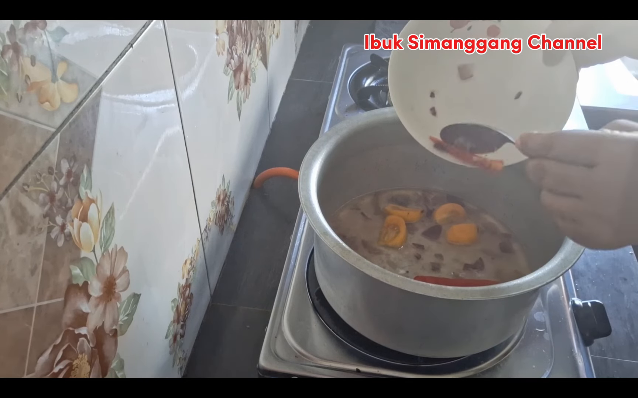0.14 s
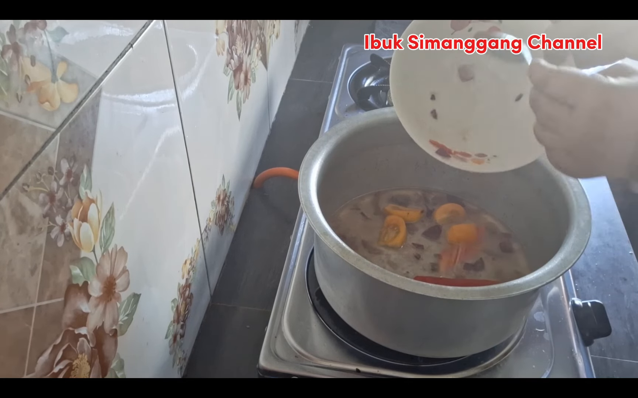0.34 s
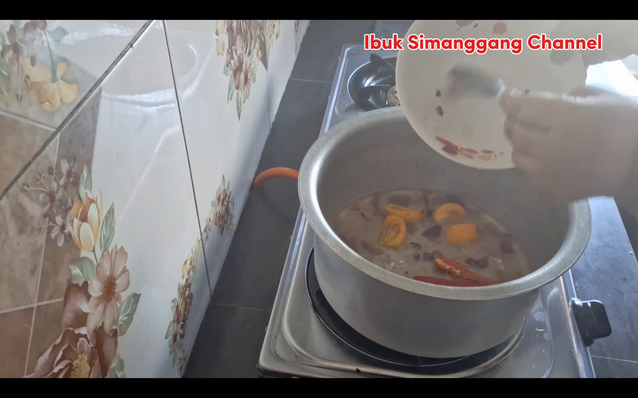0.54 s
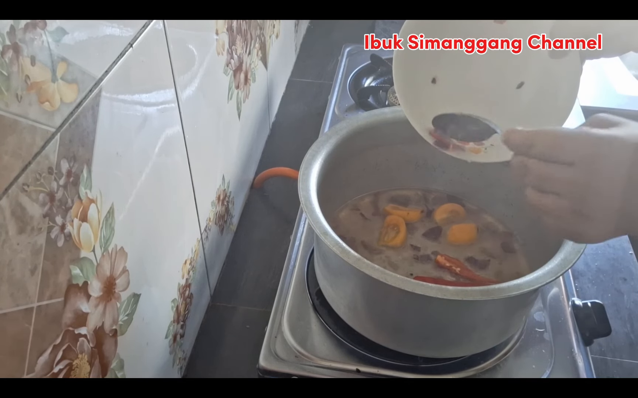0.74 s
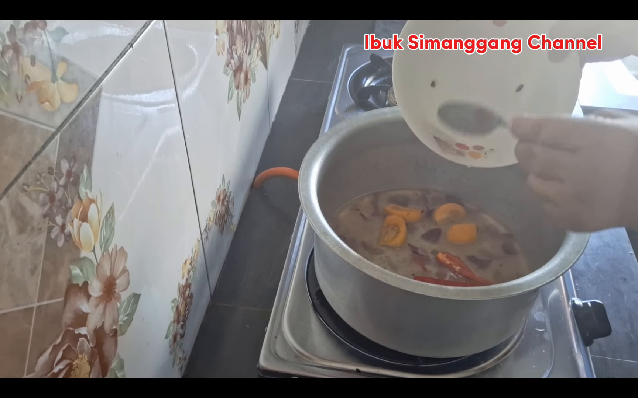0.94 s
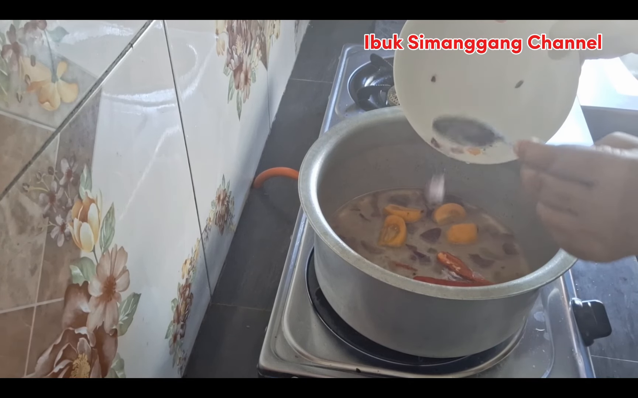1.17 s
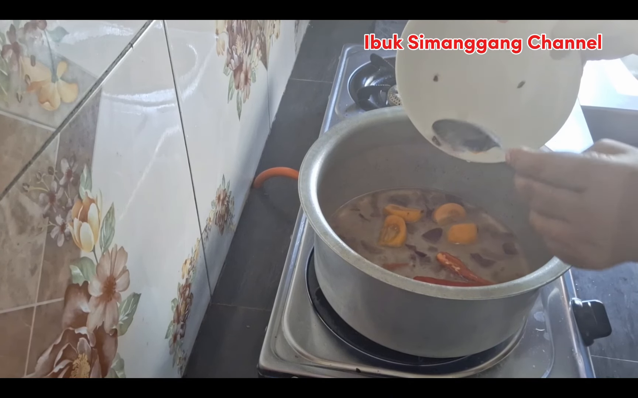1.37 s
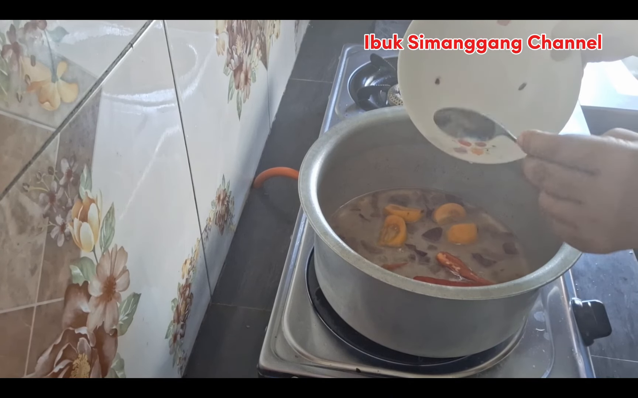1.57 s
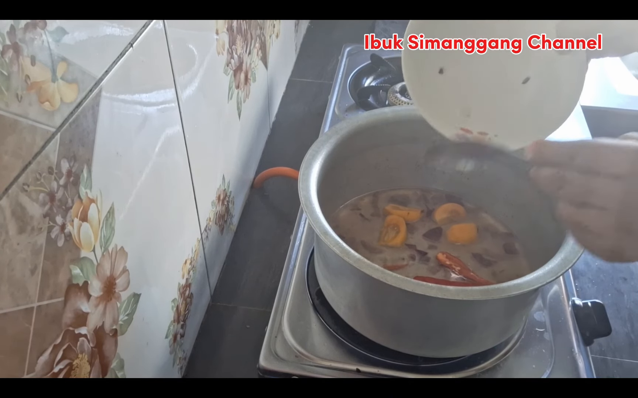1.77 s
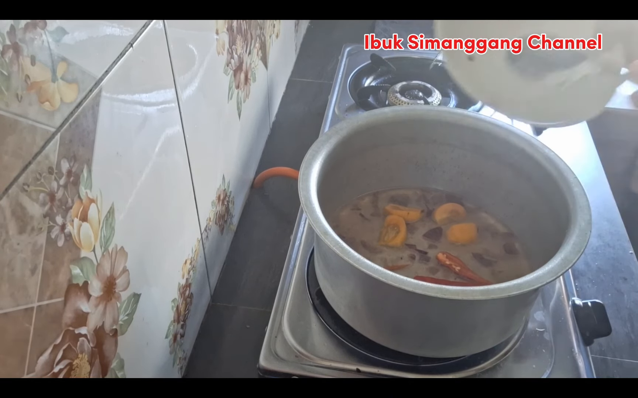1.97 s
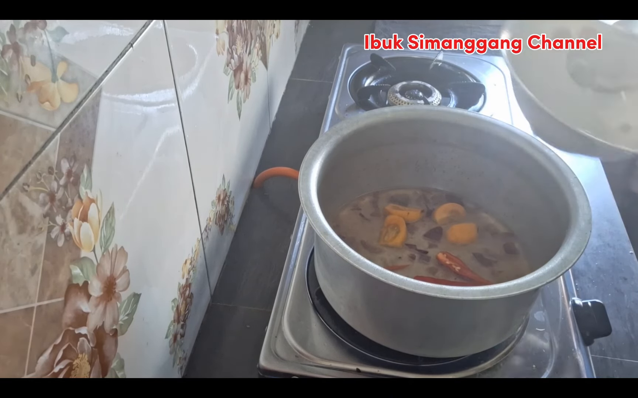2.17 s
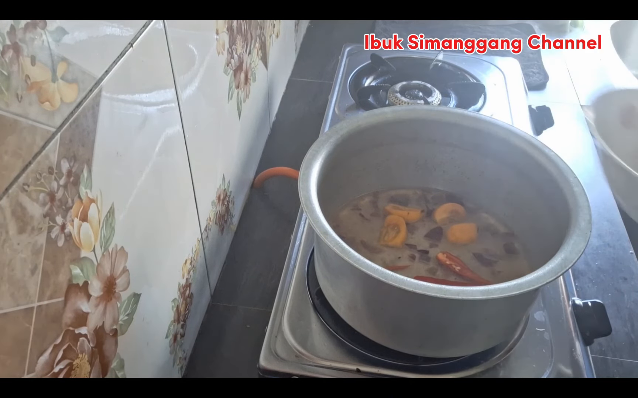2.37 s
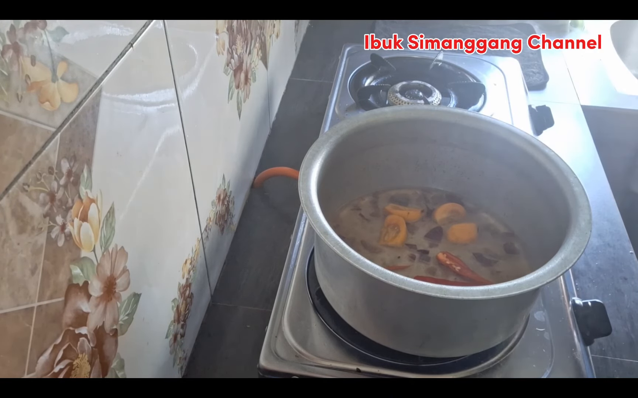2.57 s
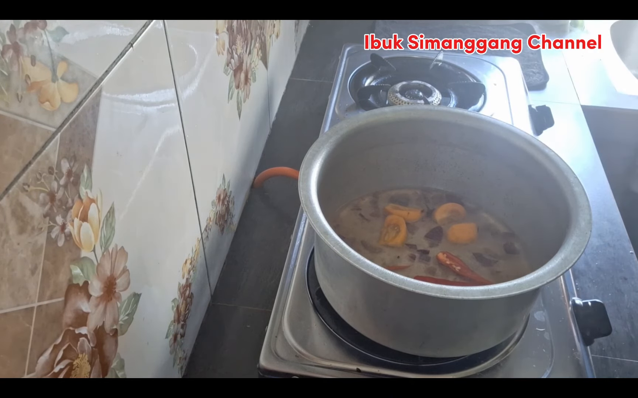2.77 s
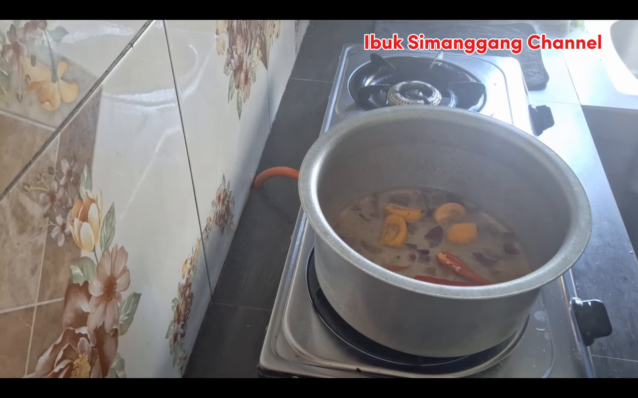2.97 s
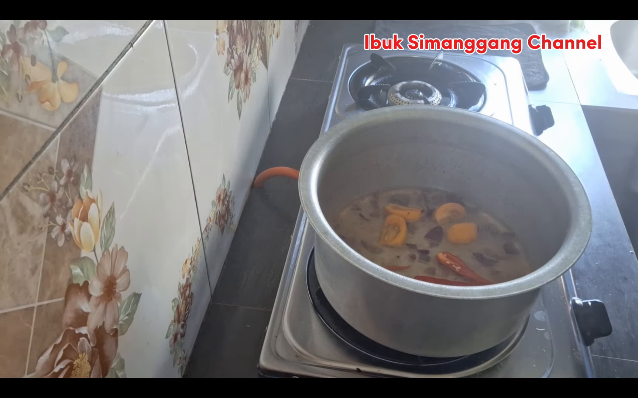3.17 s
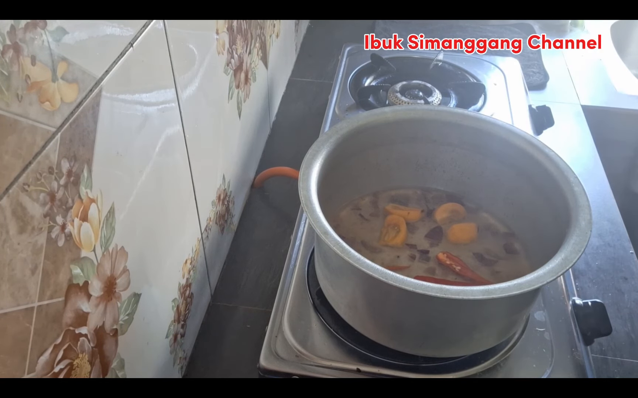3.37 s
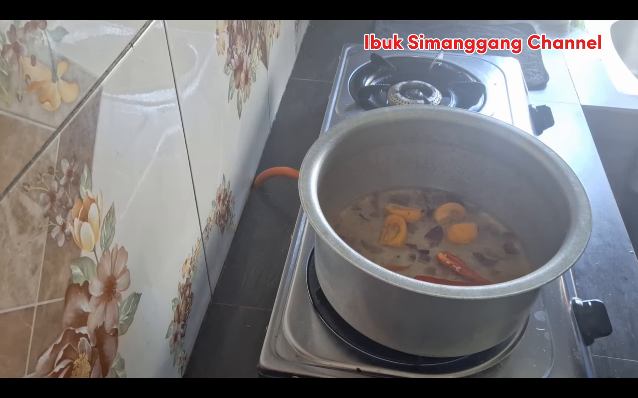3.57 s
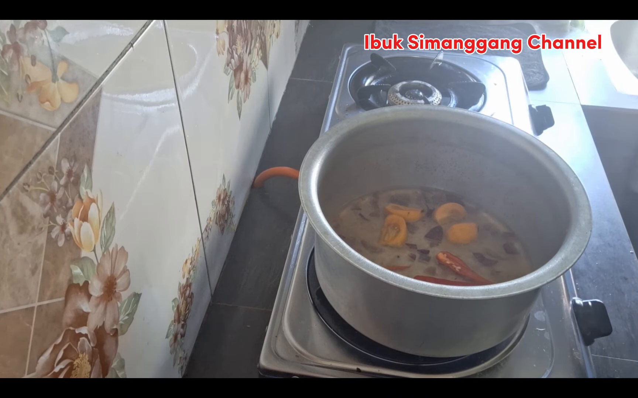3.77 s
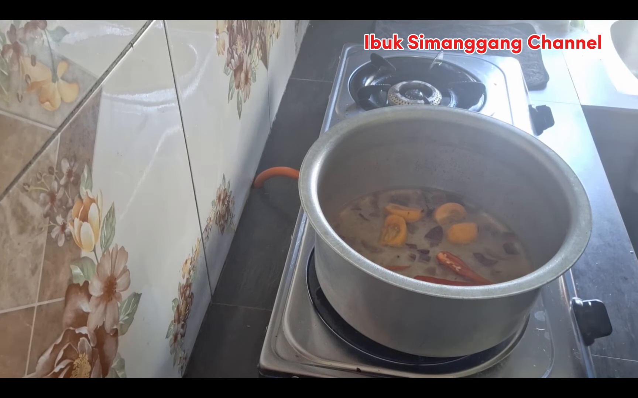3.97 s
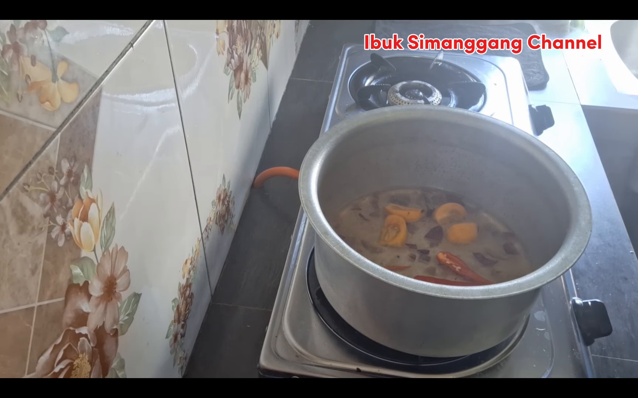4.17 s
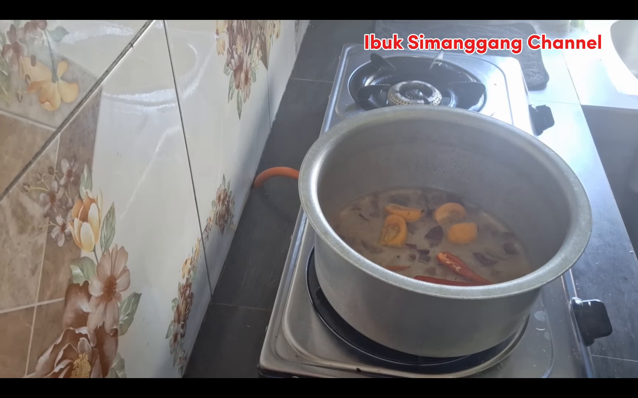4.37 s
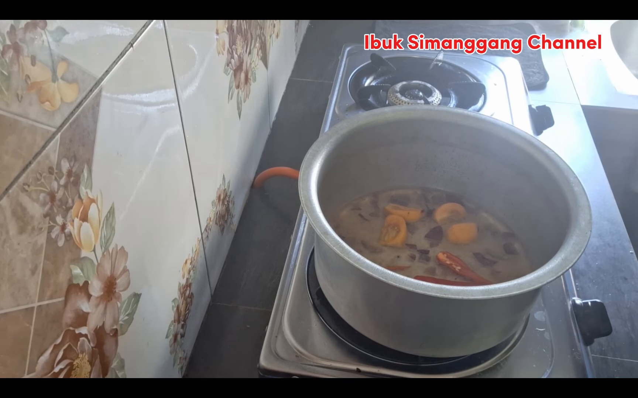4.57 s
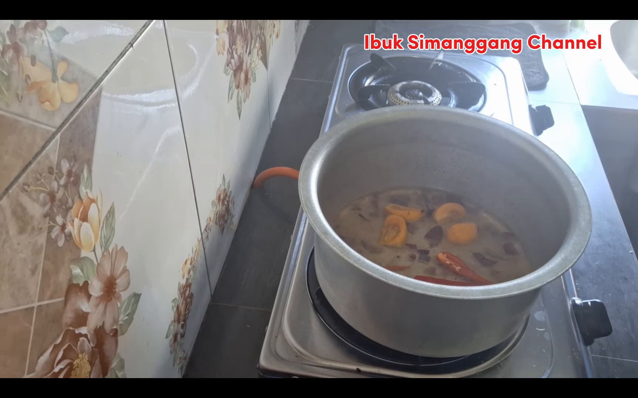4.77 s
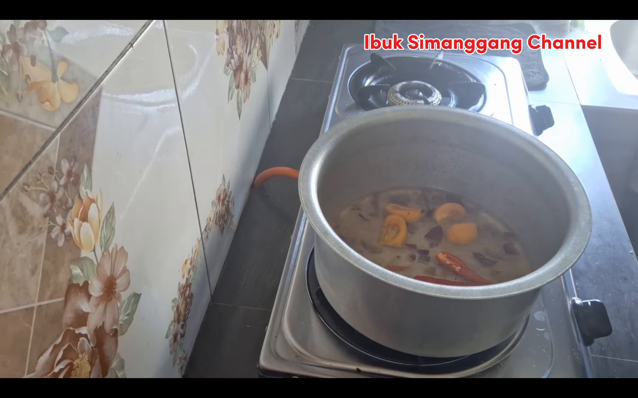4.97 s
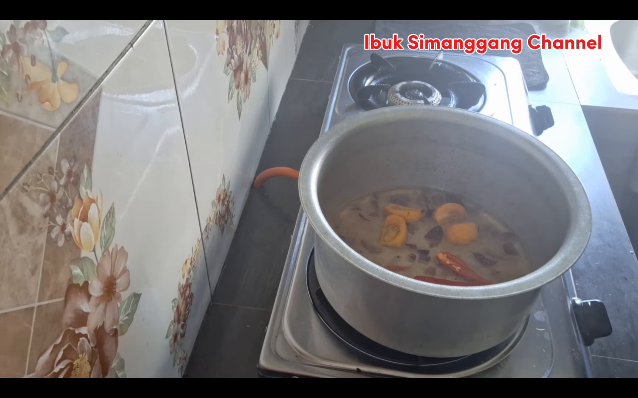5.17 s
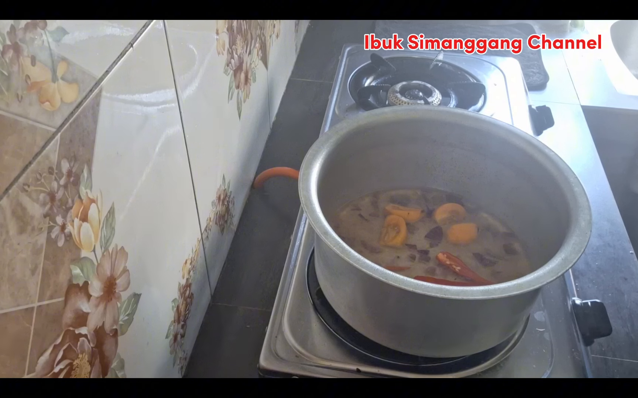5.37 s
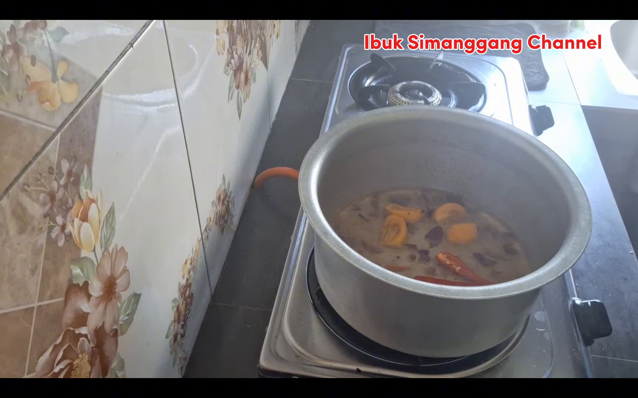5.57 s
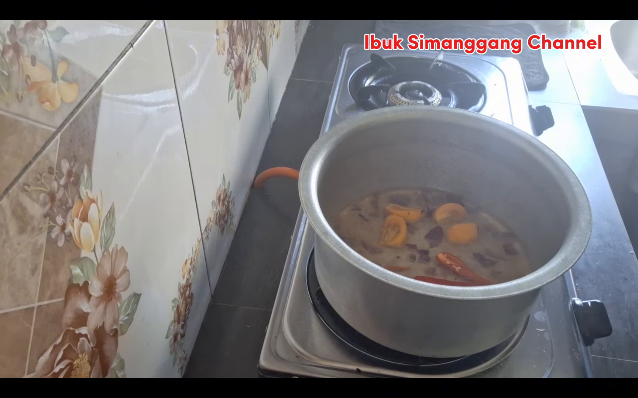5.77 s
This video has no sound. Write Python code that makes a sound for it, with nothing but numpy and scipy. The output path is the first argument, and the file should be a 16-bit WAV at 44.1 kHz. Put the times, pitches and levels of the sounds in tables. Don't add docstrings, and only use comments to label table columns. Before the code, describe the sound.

In a small tiled kitchen, a wavering low motor hum and gas flame hiss run throughout. Close to a stereo microphone, a spoon ticks and scrapes a ceramic bowl, then taps it three times with bright rings. Bowl and spoon rattle together, go nearly quiet, then land on a counter with a double clack and a little glassy jiggle.

```python
import sys
import numpy as np
from scipy import signal
from scipy.fft import rfft, irfft, next_fast_len
from scipy.io import wavfile
from scipy.ndimage import uniform_filter1d

SR = 44100
rng = np.random.default_rng(int(sys.argv[2]) if len(sys.argv) > 2 else 0)


def inscribe(sig):
    pcm = np.round(np.clip(np.atleast_2d(sig).T, -1, 1) * 32767)
    wavfile.write(sys.argv[1], SR, pcm.astype(np.int16))


def elevation(decibels):
    levels = np.asarray(decibels, float)
    return 10 ** (levels / 20)


N = 256662


def evened(x):
    return x / np.sqrt(np.mean(x ** 2) + 1e-20)


def read(points, hz):
    f, value = np.transpose(points)
    return np.interp(np.log(hz + 1), np.log(f + 1), value)


def along(rows, t):
    s, db = np.transpose(rows)
    return np.interp(t, s, db)


def fuzzy_tone(hz, width):
    r = np.exp(-np.pi * width / SR)
    noise = rng.standard_normal(N) + 1j * rng.standard_normal(N)
    slow = signal.lfilter([1], np.convolve([1, -r], [1, -r]), noise)
    return slow * np.exp(2j * np.pi * hz * np.arange(N) / SR)


def fading_tone(hz, width, fade):
    tone = fuzzy_tone(hz, width)
    return evened((tone * abs(tone) ** (fade - 1)).real)


# t/s, level/dB
BACKGROUND_SWELL = [(0.0, 4), (0.45, 6), (1.0, 5), (1.05, -0.5), (2.3, 0), (4.25, -1), (4.5, 4), (5.1, 3),
                    (5.82, 1)]
# t/s, level/dB
MOTOR_LEVEL = [(0.0, -34), (0.3, -30), (0.39, -37), (0.46, -28), (0.86, -41.5), (0.99, -35), (1.06, -53),
               (1.57, -36), (1.81, -47), (1.92, -37), (2.78, -47.5), (3.28, -36), (3.4, -39), (4.3, -42),
               (4.5, -31.5), (4.68, -38.5), (5.12, -33.5), (5.5, -37)]
# f/Hz, width/Hz, level/dB re the overtone group
MOTOR_OVERTONES = [(113.2, 2.3, -12), (180.7, 14.7, -16.5), (280.3, 11.9, -18), (690, 35, -14)]


def hum():
    t = np.arange(N) / SR
    swell_db = along(BACKGROUND_SWELL, t)
    low = elevation(-44.5 + 1.06 * swell_db) * fading_tone(59, 6.9, fade=0.61)
    main = elevation(along(MOTOR_LEVEL, t)) * fading_tone(92.5, 5, fade=0.44)
    overtones = sum(elevation(db) * evened(fuzzy_tone(hz, width).real) for hz, width, db in MOTOR_OVERTONES)
    tones = low + main + elevation(-40.5 + 0.98 * swell_db) * overtones
    return np.array([elevation(1.5) * tones, elevation(-1.0) * np.roll(tones, 25)])


# f/Hz, level/(dB per Hz)
HISS_COLOUR = [(12, -45), (20, -26), (43, -10), (75, 9), (102, -7.5), (147, -10.5), (224, -21),
               (289, -15.5), (382, -34.5), (452, -24.5), (599, -27), (750, -30), (5360, -36.5),
               (15200, -48), (16500, -78.5)]
# f/Hz, correlation
PORT_LIKENESS = [(60, 0.77), (130, 1), (290, 0.66), (640, 0.66), (1410, -0.1), (3100, -0.036),
                 (6820, -0.12), (15000, 0.061)]
# f/Hz, left minus right level/dB
PORT_LEAN = [(60, 3.5), (180, 3.0), (550, 1.0), (1650, 1.0), (4970, -0.5), (15000, -2.0)]


def hiss():
    frames, hz = N // 512 + 5, np.fft.rfftfreq(2048, 1 / SR)
    a, b, c, d, patches = rng.standard_normal((frames, 1025, 5)).T
    patches = evened(uniform_filter1d(uniform_filter1d(patches, 16, 0), 6, 1))
    same = np.clip(read(PORT_LIKENESS, hz), -1, 1)[:, None]
    left = a + 1j * b
    right = same * left + np.sqrt(1 - same ** 2) * (c + 1j * d)
    z = np.array([left, right])
    z *= elevation(np.array([[.5], [-.5]]) * read(PORT_LEAN, hz))[:, :, None]
    swell = along(BACKGROUND_SWELL, (np.arange(frames) - 2) * 512 / SR)
    bass = (1 / (1 + (hz / 330) ** 4))[:, None]
    reach = read([(1500, 0.98), (8000, 0.26)], hz)[:, None]
    rumble_db, flame_db = -5 + 0.9 * swell, 13 + 0.66 * swell
    swell_db = bass * rumble_db + (1 - bass) * reach * flame_db
    colour_db = read(HISS_COLOUR, np.minimum(hz, 15000)) - 30 * (hz > 15900)
    z *= elevation(colour_db[:, None] + 0.97 * patches + swell_db)
    return elevation(21.5) * signal.istft(z, nperseg=2048, noverlap=1536)[1][:, :N] / 2048


# f/Hz, t60/s
ROOM_DECAY = [(500, 0.49), (2500, 0.47), (8000, 0.44), (14000, 0.27)]


def kitchen(x):
    taps = np.zeros((2, SR))
    at = np.arange(300, SR - 20, 20) + rng.integers(0, 20, (2, (SR - 301) // 20))
    np.put_along_axis(taps, at, rng.choice([-1., 1.], at.shape), 1)
    hz, t, z = signal.stft(taps, SR, nperseg=256)
    fall = elevation(-60 * t / read(ROOM_DECAY, hz)[:, None])
    spectrum = rfft(signal.istft(z * fall, SR, nperseg=256)[1])
    power = abs(spectrum) ** 2
    level_out = np.sqrt(uniform_filter1d(power, size=800) / uniform_filter1d(power, size=25))
    tail = irfft(spectrum * level_out)[:, :SR * 3 // 4]
    tail[:, :300] = 0
    return signal.fftconvolve(x, tail / np.linalg.norm(tail[0]), axes=1)[:, :N]


def chatter(seconds, db, size):
    t = np.arange(size) / SR
    contact = rng.standard_normal(size) * (rng.random(size) < 1500 / SR) * np.exp(-(t / seconds) ** 2)
    contact = elevation(db) * contact / np.linalg.norm(contact)
    contact[0] = 1
    return contact


def blows(rows, body, reach, chatter_s, chatter_db, crack_db, grip_s, grip_db, free, size=7200):
    out, t = np.zeros((2, N + size)), np.arange(size) / SR
    hz = np.fft.rfftfreq(size, 1 / SR)
    centres = np.array([np.mean([mode[0] for mode in family]) for family in body])
    lowest_hz = 0.42 * min(mode[0] for family in body for mode in family)
    grip = elevation(grip_db / (1 + np.exp(-(t - grip_s) / .002)))
    rise = 1 - np.exp(-t / 0.000097)
    crack_edges_db = 45 * np.log10(np.minimum(hz / (1.08 * centres.min()), 1) + 1e-3)
    crack_edges_db += -8 * np.log2(np.maximum(hz / centres.max(), 1))
    base_db, shift_db = np.transpose(reach)
    for s, strength_db, hardness, spot in rows:
        tilt_db = hardness * np.log2(centres / 4000)
        levels = strength_db + base_db + tilt_db + spot * shift_db
        contact = chatter(chatter_s, chatter_db, size)
        drive = np.sqrt(uniform_filter1d(abs(rfft(contact)) ** 2, size=25) + 0.033)
        crack_colour_db = read(sorted(zip(centres, levels)), hz) + crack_edges_db
        crack = irfft(rfft(rng.standard_normal((2, size))) * elevation(crack_colour_db), size)
        ring = rise * elevation(crack_db - 60 * t / 0.11) * crack / np.linalg.norm(contact)
        for family, level_db in zip(body, levels):
            for mode_hz, db, t60 in family:
                start = rng.uniform(0, 2 * np.pi)
                apart = rng.choice([-1, 1]) * rng.uniform(0.38, 1.0) * min(mode_hz / 900, 1)
                turn = start + apart * np.array([[-1], [1]])
                height = elevation(level_db + db - 60 * t / (free * t60)) / np.interp(mode_hz, hz, drive)
                ring += rise * height * np.sin(2 * np.pi * mode_hz * t + turn)
        at = round(s * SR)
        out[:, at:at + size] += grip * signal.fftconvolve(ring, contact[None], axes=1)[:, :size]
    bass_cut = signal.butter(4, lowest_hz, "high", fs=SR, output="sos")
    return signal.sosfilt(bass_cut, out[:, :N])


# f/Hz, level/dB, t60/s
GLASS_MODES = [
    [(4330, 0, 0.081), (4340, 1, 0.066)],
    [(2890, 0, 0.12)],
    [(2840, 0, 0.06)],
    [(7300, 0, .04)],
    [(10500, 0, 0.0099), (12800, 0, 0.0098), (14600, 0, .008)],
]
# level/dB struck mid-side, gain/dB as the spot moves to +1
GLASS_SHARE = [(5, 6), (-5, 11), (0, -4), (-6.6, 0.3), (-6, 2)]
# t/s, level/dB, hardness/(dB per octave), spot -1 to 1
GLASS_TOUCHES = [(4.955, -49, 4.4, 0.11), (4.9755, -51.6, -1.2, 0.96), (4.9942, -57, 8, 0.14),
                 (5.0152, -48.5, -1.9, 0.3), (5.0294, -61, -2.0, -0.91), (5.046, -44, 0, -1.0),
                 (5.0624, -55.6, -4.3, -0.01), (5.1544, -50, 0.9, -0.14), (5.1744, -56, -2.6, 0.12)]


def glass_jiggle():
    return blows(GLASS_TOUCHES, GLASS_MODES, GLASS_SHARE, chatter_s=0.01, chatter_db=4, crack_db=4,
                 grip_s=0.037, grip_db=3.0, free=1.33)


# f/Hz, level/dB, t60/s
COUNTER_MODES = [
    [(1077, -5.5, 0.058), (1184, -2.5, 0.029)],
    [(709, -0.5, 0.092), (505, -4, 0.068), (384, -25, 0.034), (813, 1, 0.074), (960, 4.5, 0.048)],
    [(1560, -4.5, 0.032), (1730, -7, 0.049), (1910, -3, 0.016), (2160, -7.5, 0.038), (2550, -6.5, 0.024),
     (2720, -11.5, 0.027)],
    [(3876, -4, 0.075), (4010, -6, 0.068)],
    [(7480, -4, 0.16), (7350, -1, 0.065), (5800, 3, 0.016), (8100, -9, 0.22), (8780, -1.5, 0.038),
     (9500, -16, 0.086), (9670, -5, 0.12), (12900, -14, .03)],
]
# level/dB struck mid-side, gain/dB as the spot moves to +1
COUNTER_SHARE = [(12, -7.5), (-3.5, -6.5), (6, 9), (-1.8, 2), (-11.5, -13.5)]
# t/s, level/dB, hardness/(dB per octave), spot -1 to 1
LANDINGS = [
    (4.7281, -15, -0.5, 0.14),
    (4.7457, -15, 3, -0.063),
    (4.7744, -37.5, -5, 0.59),
    (4.817, -33.5, -3, -0.26),
    (4.8278, -23.5, 3.5, -0.52),
    (4.8556, -33, 1.2, -.23),
    (4.9048, -48, -2, 0.33),
    (4.9844, -53.5, -8.5, 0.97),
]


def set_down():
    return blows(LANDINGS, COUNTER_MODES, COUNTER_SHARE, chatter_s=0.01, chatter_db=-2.5, crack_db=-1.5,
                 grip_s=0.013, grip_db=3.5, free=0.89)


# f/Hz, level/dB, t60/s
STACK_MODES = [
    [(3775, 0, .08), (3960, -7, .04), (3535, -12, .03)],
    [(3828, 0, .08), (2660, -9, .14), (6126, -5, .07), (8689, -9, .07), (10438, -12, .05)],
    [(4140, 0, .09), (5780, -1, .08), (6240, -6, .04), (7780, -5, .05), (8110, -3, .06)],
    [(7255, 0, .06), (7375, -8, .05), (9800, -10, .04)],
    [(13400, 0, .04), (12800, -2, .05), (12300, -4, .04), (11275, -4, .05), (11520, -6, .04),
     (9375, -6, .04), (8980, -7, .04), (14923, -5, .04)],
]
# level/dB struck mid-side, gain/dB as the spot moves to +1
STACK_SHARE = [(0.86, -12), (-0.55, 13.5), (-2.2, -6.5), (-0.21, 18), (-1.3, -5)]
# t/s, level/dB, hardness/(dB per octave), spot -1 to 1
STACK_KNOCKS = [
    (2.7817, -9.5, -3.5, 0.32),
    (2.9213, -12.8, -10.5, -0.2),
    (2.9359, -26.5, -0.5, 0.52),
    (2.9934, -24, 1.5, -0.75),
    (3.0071, -16.5, 1.5, -0.56),
    (3.1599, -13, -7.6, 0.056),
    (3.2305, -20.5, -3, -0.094),
]
# t/s, level/dB, hardness/(dB per octave), spot -1 to 1
STACK_SLIPS = [(2.7977, -23.5, -0.5, -0.6), (2.908, -36, -2, 0.26), (2.9149, -32.5, 3, -0.29),
               (3.0234, -44.5, 19, 0.43), (3.0488, -29.5, 4.5, -0.17), (3.0755, -38.5, 8, 0.45),
               (3.0919, -30, 3, 0.12), (3.1098, -35, 1.6, 0.17), (3.243, -47, 0, 0.1)]


def rattle():
    knocks = blows(STACK_KNOCKS, STACK_MODES, STACK_SHARE, chatter_s=0.0062, chatter_db=-2.0, crack_db=-4.0,
                   grip_s=0.03, grip_db=2, free=0.72)
    slips = blows(STACK_SLIPS, STACK_MODES, STACK_SHARE, chatter_s=0.024, chatter_db=-0.5, crack_db=5,
                  grip_s=0.048, grip_db=-25, free=0.85)
    return knocks + slips


# f/Hz, level/dB, t60/s
SPOON_MODES = [
    [(3885, 0, .11)],
    [(1905, -1, .02), (2280, 0, .02), (2620, -3, .02), (2900, 0, .02), (3270, -1, .02), (1460, -5, .03)],
    [(6185, 0, .11), (6400, -7, .03), (6720, -6, .03), (6930, -8, .03)],
    [(5812, 0, .11), (7335, -8, .06)],
    [(8810, 0, .03), (7630, -1, .04), (9500, -4, .02), (10300, -5, .02), (13200, -4, .02)],
]
# level/dB struck mid-side, gain/dB as the spot moves to +1
SPOON_SHARE = [(7.5, 4.5), (4, -7.5), (-4.5, -7), (-3, 7), (-7, 9.5)]
# t/s, level/dB, hardness/(dB per octave), spot -1 to 1
SPOON_TICKS = [
    (0.0408, -24.5, 1.3, 0.017),
    (0.4403, -29, 4.5, 0.79),
    (0.4949, -60, 3, -.44),
    (2.4077, -35, 12.5, -0.28),
    (2.5942, -49, 9, 0.18),
    (2.7086, -49.5, -14, .99),
    (3.6501, -54, -5, .63),
]
# t/s, level/dB, hardness/(dB per octave), spot -1 to 1
SPOON_RUBS = [
    (0.066, -37, 1, -0.7),
    (0.0853, -45, -2, -.9),
    (0.637, -37.5, -11, -0.21),
    (0.654, -45, -4, -0.57),
]


def spoon():
    ticks = blows(SPOON_TICKS, SPOON_MODES, SPOON_SHARE, chatter_s=0.0021, chatter_db=-1.0, crack_db=1.5,
                  grip_s=0.021, grip_db=-30, free=1.0)
    rubs = blows(SPOON_RUBS, SPOON_MODES, SPOON_SHARE, chatter_s=0.018, chatter_db=14, crack_db=2,
                 grip_s=0.027, grip_db=-12, free=0.94)
    return ticks + rubs


# f/Hz, level/dB, t60/s
BOWL_MODES = [
    [(3872, 0, .14), (4130, -4, .12), (3640, -10, .04)],
    [(2655, 0, .13), (1520, -11, .05), (2280, -14, .03)],
    [(5836, 0, .13), (6185, -11, .08), (6000, -13, .05), (5440, -15, .04)],
    [(7785, 0, .12), (7330, -14, .05), (8005, -14, .05), (9130, -10, .07)],
    [(10064, 0, .07), (9700, -6, .04), (9850, -9, .05), (10350, -10, .04), (11520, -7, .06),
     (12365, -8, .05), (13200, -12, .04), (15095, -8, .06)],
]
# level/dB struck mid-side, gain/dB as the spot moves to +1
BOWL_SHARE = [(1.5, 0.5), (-0.2, -4.5), (1, -4.2), (-3.6, -13), (-2.1, 6)]
# t/s, level/dB, hardness/(dB per octave), spot -1 to 1
BOWL_TAPS = [
    (1.0186, -14.5, 2.5, 0.46),
    (1.3389, -13, 1.5, -0.0044),
    (1.6676, -15.5, 2.5, -0.5),
    (4.3154, -56, -3.8, -1.0),
]
# t/s, level/dB, hardness/(dB per octave), spot -1 to 1
BOWL_SCRAPES = [(0.1423, -27.5, -1, 0.054), (0.159, -30, -3, 0.023), (0.1716, -50, -6, 0.54),
                (0.5798, -51, 4.5, -0.45), (0.6187, -46.5, 4, -0.27), (0.6644, -56, 4, 0.65),
                (1.104, -32.5, 0.3, -0.39), (1.1117, -42.5, -8.5, 0.24), (4.11, -54.5, -2, -0.27),
                (4.147, -53, -5, 0.48), (4.1747, -57, -1.2, -0.11), (4.2044, -50.5, -1, -0.44),
                (4.2394, -56.4, -2, -0.13)]


def bowl():
    taps = blows(BOWL_TAPS, BOWL_MODES, BOWL_SHARE, chatter_s=0.0023, chatter_db=-2, crack_db=1.5,
                 grip_s=0.018, grip_db=-19, free=0.84)
    scrapes = blows(BOWL_SCRAPES, BOWL_MODES, BOWL_SHARE, chatter_s=0.02, chatter_db=7.5, crack_db=10,
                    grip_s=0.03, grip_db=-35, free=0.5)
    return taps + scrapes


def scene():
    crockery = glass_jiggle() + set_down() + rattle() + spoon() + bowl()
    return hum() + hiss() + elevation(-6.5) * kitchen(crockery) + crockery


def roll_off(x):
    return signal.sosfilt(signal.butter(12, 16980, fs=SR, output="sos"), x)


def record(dry):
    size = next_fast_len(N)
    hz = np.fft.rfftfreq(size, 1 / SR)
    spectrum = rfft(1.05 * np.tanh(dry / 1.05), size)
    spectrum *= elevation(np.array([[-1.], [1.]]) * 1.5 * np.clip(hz / 12000, 0, 1) ** 2)
    spectrum /= 1 + (hz / 15950) ** 160
    mix = irfft(spectrum, size)[:, :N]
    return roll_off(mix)


dry = scene()
out = record(dry)
inscribe(out)
```